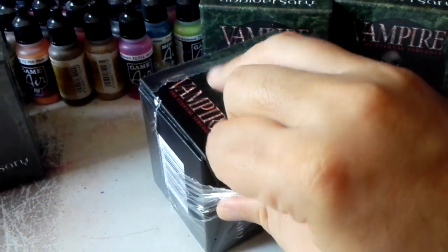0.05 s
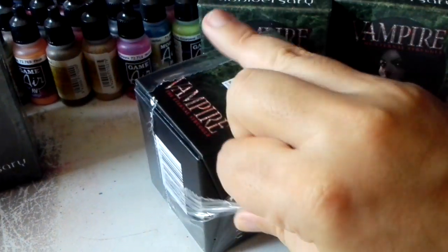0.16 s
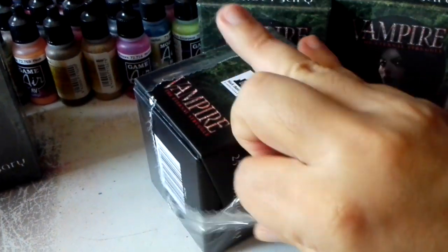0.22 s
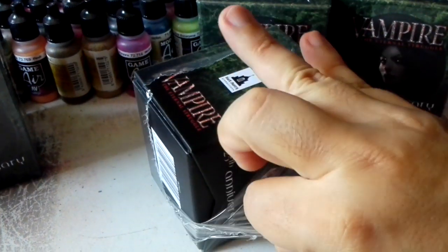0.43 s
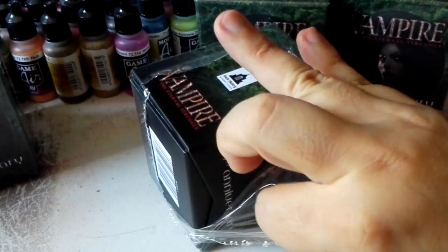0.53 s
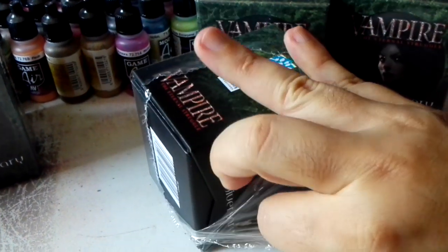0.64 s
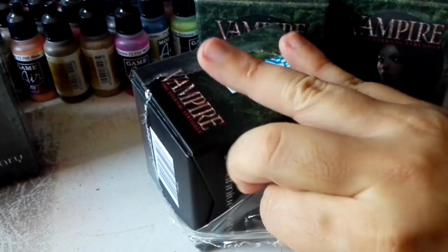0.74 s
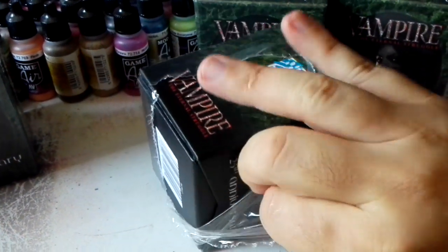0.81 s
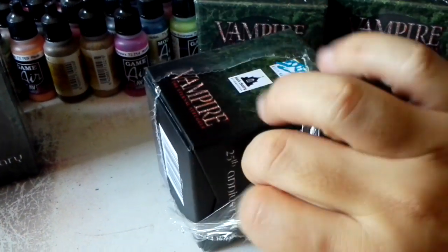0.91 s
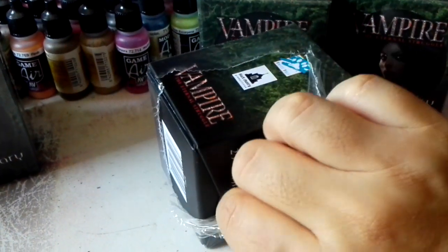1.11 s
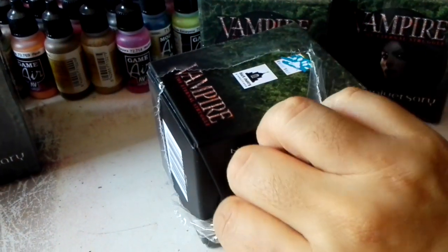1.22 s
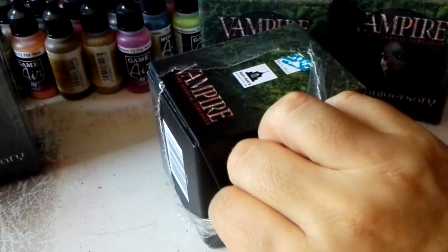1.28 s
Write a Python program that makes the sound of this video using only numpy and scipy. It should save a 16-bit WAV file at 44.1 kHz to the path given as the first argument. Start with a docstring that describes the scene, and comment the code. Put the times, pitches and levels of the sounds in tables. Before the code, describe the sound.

Shrink wrap is peeled off a cardboard box, close and bright on the left, duller on the right. Crinkles build to a hard, loud crack with a hollow box knock at 0.25 s, then a lull. A smaller tear snaps at 0.47 s. From 0.7 to 1.3 s come uneven rustles, scattered snaps and soft thuds, with a brief fingertip judder at 0.8 s. Small room, faint low rumble.

```python
"""Peeling shrink wrap off a box

Shrink wrap is peeled off a cardboard box, close to the left microphone in a small room.
The film buckles in snaps of shaped noise with a short added ring, and tears loose twice with a crack.
It slides with filtered hiss, sparse crinkles and pitched crackles; short noise tails give the room.
Tugs and fingers excite the hollow box's modes, a fingertip judders over it once, and soft thuds are low sines."""
import sys
import numpy as np
from scipy import signal
from scipy.fft import rfft, irfft, next_fast_len
from scipy.io import wavfile
from scipy.ndimage import uniform_filter1d, map_coordinates

SR = 44100
rng = np.random.default_rng(int(sys.argv[2]) if len(sys.argv) > 2 else 0)


def wav_out(sig):
    """Save sig, one row per channel (or a flat mono array), as 16-bit PCM at SR to the path in sys.argv[1]."""
    wavfile.write(sys.argv[1], SR, np.round(np.clip(np.atleast_2d(sig).T, -1, 1) * 32767).astype(np.int16))


N = 59535  # length in samples

# Colour of the sliding film, for hiss, crinkles and crackles. Each row: frequency in Hz, level in dB.
FRICTION_COLOUR = [(200, -43), (700, -9), (1600, -14), (2700, -7.5), (3800, -7), (5000, -11), (7500, -6.5),
                   (10500, -2), (12500, 0), (14100, -3.5), (15000, -42)]

SNAP_RISE_S = 0.0001804  # onset time constant of snaps and pings


def amp(db):
    """Decibels to gain."""
    return 10 ** (np.asarray(db) / 20)


def unit(x):
    """Scaled to rms 1."""
    return x / np.sqrt(np.mean(x ** 2) + 1e-20)


def norm(x):
    """Scaled to energy 1."""
    return x / (np.linalg.norm(x) + 1e-20)


def along(points, hz):
    """Values at hz, read between (Hz, value) points on a log frequency axis."""
    f, v = np.transpose(points)
    return np.interp(np.log(hz + 1), np.log(f), v)


def colour(x, points):
    """Causal minimum-phase filter with the given (Hz, dB) shape."""
    n = x.shape[-1]
    m = 2 * next_fast_len(n // 2 + 1024)
    log_gain = np.log(amp(along(points, np.fft.rfftfreq(m, 1 / SR))))
    # folding the cepstrum onto positive times makes the filter causal
    cepstrum = irfft(log_gain, m)
    cepstrum[1:m // 2] *= 2
    cepstrum[m // 2 + 1:] = 0
    response = np.exp(rfft(cepstrum))
    return irfft(rfft(x, m) * response, m)[..., :n]


def tinted(points):
    """A spectrum with random bumps and dips: every fold of film has a colour of its own."""
    tint_db = 2
    return [(hz, db + tint_db * rng.standard_normal()) for hz, db in points]


def add(track, s, sound):
    """Mixes a sound into the track at time s."""
    part = track[max(0, round(s * SR)):][:len(sound)]
    part += sound[:len(part)]


def delay(x, s):
    """The same sound s seconds later."""
    return np.pad(x, (max(0, round(s * SR)), 0))[:N]


def wobble(rate):
    """A smooth random curve, rate knots a second."""
    return map_coordinates(rng.standard_normal(N), [np.arange(N) * rate / SR], mode="wrap")


def floor():
    """Low room rumble, nearly the same on both sides, and a faint hiss."""
    # The room's background. Each row: frequency in Hz, level in dB.
    floor_colour = [(25, -9), (45, 6), (110, -0.5), (220, 1.5), (280, -6.5), (400, -5.5), (600, -13.5),
                    (1200, -18), (2500, -22.5), (5000, -32), (12000, -36.5), (15000, -45)]
    # Stereo spread, side against mid. Each row: frequency in Hz, level in dB.
    side_colour = [(30, -11.5), (150, -17), (400, -2.5), (1500, -1), (8000, 5.5)]
    floor_db = -51
    mid, side = unit(colour(rng.standard_normal((2, N)), floor_colour))
    side = colour(side, side_colour)
    return amp(floor_db) * np.array([mid + side, mid - side])


def ping(hz, t60):
    """A short decaying ring whose pitch is unsteady."""
    blur_hz = 435  # rms pitch drift
    t = np.arange(SR // 40) / SR
    drift = blur_hz * unit(uniform_filter1d(rng.standard_normal(len(t)), size=64))
    tone = np.sin(2 * np.pi * np.cumsum(hz + drift) / SR)
    rise = 1 - np.exp(-t / SNAP_RISE_S)
    return norm(amp(-60 * t / t60) * rise * tone)


def crackles(count=1800):
    """Larger creases among the crinkles give way at random, each with its own pitch and size."""
    per_s, spread_db, t60_s = 750, 3.5, .004
    centre_hz, spread_oct, top_hz = 9136, .55, 14138  # pitches at or above the top are left out
    out = np.zeros(N)
    gaps, sizes = rng.exponential(size=(2, count))
    times = np.cumsum(gaps) / per_s
    pitches = centre_hz * 2 ** (spread_oct * rng.standard_normal(count))
    for s, size, hz in zip(times, np.minimum(sizes, 4), pitches):
        if hz < top_hz:
            level = amp(spread_db * size + along(FRICTION_COLOUR, hz))
            add(out, s, level * ping(hz, t60_s))
    return unit(out)


def slide():
    """Sliding film: a hiss of friction, a spray of tiny crinkles and pitched crackles, in uneven spurts."""
    # Film sliding over the box. Each row: time in seconds, level in dB before the catching wobble.
    slide_level = [(0, -53.5), (0.042, -46), (0.059, -39), (0.102, -46), (0.148, -36), (.205, -36.5),
                   (.24, -38.5), (.275, -30.5), (0.349, -56), (.45, -59.5), (.49, -39.5), (.54, -54.5),
                   (.59, -45.5), (.63, -63), (.708, -61), (.725, -43.5), (.76, -41.5), (.81, -48),
                   (.85, -43.5), (.89, -42), (0.921, -40.5), (0.948, -33.5), (0.996, -50), (1.045, -42),
                   (1.10, -52), (1.14, -44), (1.174, -42.5), (1.21, -47), (1.25, -39.5), (1.288, -41),
                   (1.35, -59)]
    catch_db, catch_knots_per_s = 2, 160  # the sliding film catches and lets go
    hiss_db, crinkle_db, crackle_db = -3, -6.5, -7.5
    crinkles_per_s, crinkle_spread_db = 2400, 4

    stroke_db = np.interp(np.arange(N) / SR, *np.transpose(slide_level))
    level = amp(stroke_db + catch_db * wobble(catch_knots_per_s))
    hiss = unit(colour(rng.standard_normal(N), FRICTION_COLOUR))
    sizes = amp(crinkle_spread_db * np.minimum(rng.exponential(size=N), 4))
    grains = sizes * rng.choice([-1, 1], N) * (rng.random(N) < crinkles_per_s / SR)
    crinkles = unit(colour(grains, FRICTION_COLOUR))
    return level * (amp(hiss_db) * hiss + amp(crinkle_db) * crinkles + amp(crackle_db) * crackles())


def snaps():
    """Each buckle is a sub-millisecond crack, then a brief flutter of the sheet, with a short ring added."""
    # Film snaps. Each row: start in seconds, level in dB, midrange body in dB, pitch in Hz of a short ring
    # added to the snap, ring in dB; the three levels are relative to the common ones below.
    snap_rows = [(0.0191, -38, 12.5, 4930, -7), (0.049, -24, 4, 10930, -10),
                 (0.054, -28, -11.5, 7840, -4.5), (0.0728, -22, 4.0, 9146, -0.5),
                 (0.1296, -40, 16.5, 3920.0, -17.5), (0.2158, -22.5, 0, 9130, -12),
                 (0.218, -19, 3.0, 10340, -7), (0.2229, -22.0, -6.5, 12830, 5.5),
                 (0.2317, -25.5, 6.5, 8940, -5), (0.2473, -10.5, -7.5, 10970, -7),
                 (0.2483, -9.5, -9.5, 3400, -5), (0.2521, -11, -4.5, 11970, 3), (0.2534, -1, 0, 12200, -3),
                 (0.254, -3.5, 1.5, 12150, -3.5), (0.2566, -17.5, -22, 13000, -12),
                 (0.2596, -15, -25.5, 13080, -5), (0.2624, -15, -27, 8754, 3.5),
                 (0.266, -11, -21, 8760, -15.5), (0.346, -42.5, 6, 13350.0, -4.5),
                 (0.4199, -39, 4, 13400, -2), (0.4495, -37.5, -9.5, 4940, -20.5),
                 (0.4616, -32, 1, 7200, -4), (0.4664, -27.5, 7, 6980.0, -11.5),
                 (0.471, -12.5, 2, 11450, 5.5), (0.4723, -13.5, 3, 6475, -21),
                 (0.4736, -25.5, 14, 5086, -17.5), (0.479, -31.5, 8, 13350.0, -4.5),
                 (0.4809, -39, -8, 12790.0, -5.5), (0.51, -37.5, 8, 12600, -1),
                 (0.5264, -38.5, 4.0, 11800, -4.5), (0.542, -40.0, 3.5, 13350.0, -3.0),
                 (0.552, -25, -6, 13310, 2.5), (0.5517, -29.5, -1.5, 13440, 2),
                 (0.5778, -32.5, 5, 7600, -15.5), (0.5801, -33.5, -1, 3270, -21),
                 (0.644, -33.5, -0.5, 6335, -21), (0.714, -33, 4, 11190, -7),
                 (0.7172, -18.5, -15.5, 12500, -3), (0.7558, -31, -4.5, 12190.0, -2),
                 (0.7614, -33, 7, 11460.0, -1.5), (0.7719, -45.5, 2, 13310.0, -9.5),
                 (0.7912, -27, 3.5, 10100, -9.5), (0.8307, -31.5, 11.5, 3206, -6.5),
                 (0.8984, -20, -1.5, 7600, -6.5), (0.9057, -31, 5, 11080, -4.5), (0.92, -29, -9, 3220, -7),
                 (0.959, -20.5, -3.5, 11920, -14), (0.9688, -29.5, 8, 6483, -2),
                 (1.0113, -22.5, -2, 3786, -13), (1.013, -26.0, -17.5, 13860, 1),
                 (1.0367, -26.5, -14, 9770, 2.5), (1.0541, -36, 12, 7680, -6),
                 (1.0677, -30.5, 0, 4430, -4.5), (1.0839, -36, 5.5, 10900.0, -0.5),
                 (1.1114, -28.5, -5, 13300, -14), (1.118, -28.5, 7.5, 8730, -6),
                 (1.1267, -33, 4, 11970.0, -7), (1.1504, -17, 5.5, 6900, -4.5), (1.1533, -23, 4, 4140, -19),
                 (1.158, -28.5, -9.5, 9170, 5.5), (1.1932, -31.5, 6, 3220, -13.5),
                 (1.2237, -35, 12, 3200, -9.5), (1.2341, -30, 3, 4220, -6.5), (1.2374, -28, 5, 12270, -5.0),
                 (1.2479, -27.5, 9, 4967, -4), (1.2703, -28, 8.5, 3315, -11.0),
                 (1.2894, -32, 12.5, 8000, -12.0), (1.302, -32.0, 1, 13480.0, -0.5)]
    # The film's bright snap. Each row: frequency in Hz, level in dB before tinting.
    film_colour = [(300, -87), (2500, -24), (5000, -20.5), (7500, -9.5), (9500, -4.5), (11500, 3),
                   (13200, 1.5), (14300, -12), (16000, -31)]
    # The stretched sheet's midrange. Each row: frequency in Hz, level in dB before tinting.
    sheet_colour = [(150, -28), (600, -8.5), (1100, -6), (1700, -2.5), (2300, -5), (2750, -6.5),
                    (3400, 0.5), (5000, -8), (8000, -4), (15000, -21)]
    snap_db, flutter_db, body_common_db, ring_common_db = 14, -5.5, -12.5, -0.5
    flutter_t60_s, ring_t60_s = 0.02235, .012

    out, t = np.zeros(N), np.arange(SR // 40) / SR
    crack = norm(t * np.exp(-t / SNAP_RISE_S))
    flutter = norm(amp(-60 * t / flutter_t60_s))
    for s, db, body_db, ring_hz, ring_db in snap_rows:
        crack_noise, flutter_noise, body_noise = rng.standard_normal((3, len(t)))
        fold_colour = tinted(film_colour)
        bright = norm(colour(crack_noise * crack, fold_colour))
        bright = bright + amp(flutter_db) * norm(colour(flutter_noise * flutter, fold_colour))
        body = norm(colour(body_noise * (crack + flutter), tinted(sheet_colour)))
        ring = amp(ring_common_db + ring_db) * ping(ring_hz, ring_t60_s)
        add(out, s, amp(db + snap_db) * (bright + amp(body_common_db + body_db) * body + ring))
    return out


def box_ring(centre_hz, width_oct):
    """The box's modes after one blow; those near the centre frequency are favoured."""
    # Modes of the hollow box. Each row: frequency in Hz, level in dB, 60 dB decay time in seconds.
    modes = [(171.7, 2.5, 0.044), (212.46, 6, 0.1053), (342.6, 1, 0.074), (407, -2, 0.0303),
             (443.1, -3, 0.0725), (569.6, -2, 0.0217), (731.3, -4.5, 0.0291), (818.6, -7, 0.0217),
             (939.3, 0, 0.0264), (1066.2, -6, 0.0516), (1264, 4, 0.0077), (1634, 4, 0.021),
             (2114, 10, 0.00604)]
    t = np.arange(SR // 6) / SR
    hz, db, t60 = np.transpose(modes)[:, :, None]
    nearness = 1 / (1 + (np.log2(hz / centre_hz) / width_oct) ** 2)
    gain = amp(db + rng.normal(0, 1, hz.shape)) * nearness * rng.choice([-1, 1], hz.shape)
    ringing = gain * amp(-60 * t / t60) * np.sin(2 * np.pi * hz * t)
    return norm(np.sum(ringing, axis=0))


def knocks():
    """Tugs and fingers knock the box, each contact point exciting its own range of modes."""
    # Knocks. Each row: start in seconds, level in dB, centre in Hz and width in octaves of the modes excited.
    knock_rows = [(.049, -19, 726, 0.223), (0.1664, -13.5, 1060, 0.564), (.168, -21, 200, 0.36),
                  (.248, -10, 732, 0.23), (0.2501, -5, 203, 0.29), (.2535, -8.5, 374.7, 0.186),
                  (0.254, -10.5, 774, 0.16), (0.2549, -7.5, 1628, 0.43), (.277, -29, 350, 0.43),
                  (0.4605, -12, 647, 0.306), (.4655, -15, 423, 0.79), (0.4727, -14.5, 489, 0.394),
                  (.5266, -28, 1170, 0.59), (0.5523, -23, 1780, 1), (0.718, -27, 1370, 0.61),
                  (.756, -20, 277, 0.49), (0.7983, -20.5, 640, 0.47), (.8445, -13, 396, 0.79),
                  (.848, -21.5, 790, 0.266), (.869, -22, 300, 0.69), (0.9683, -17, 465, 0.27),
                  (.977, -13.5, 302, 0.73), (1.046, -24.5, 1176, 0.39), (1.151, -17.5, 1163, 0.104),
                  (1.153, -19, 331, 0.28), (1.158, -22.5, 1480, 0.45), (1.247, -24.5, 1070, 0.223)]
    out = np.zeros(N)
    for s, db, centre_hz, width_oct in knock_rows:
        add(out, s, amp(db) * box_ring(centre_hz, width_oct))
    return out


def thuds():
    """Soft thuds as the hand pushes the box against the table: low sines that swell and die."""
    # Thuds. Each row: start in seconds, level in dB, pitch in Hz.
    thud_rows = [(0.465, -40, 180.8), (.792, -39, 185), (0.8408, -27.5, 153.9), (.856, -41, 205.6),
                 (0.9658, -33, 177), (0.98, -47.5, 201), (1.146, -41.5, 178)]
    rise_s = 0.00288  # half the time to the peak
    out, t = np.zeros(N), np.arange(SR // 10) / SR
    swell = (t / rise_s) ** 2 * np.exp(-t / rise_s)
    for s, db, hz in thud_rows:
        add(out, s, amp(db) * swell / swell.max() * np.sin(2 * np.pi * hz * t))
    return out


def judder():
    """A fingertip sticks and slips over the box, slowing and uneven; each slip also rings the modes."""
    # One soft slip of the fingertip. Each row: frequency in Hz, level in dB.
    slip_colour = [(70, -22), (170, 3.5), (400, 4), (650, -10.5), (950, -17.5), (1300, -27), (4000, -47.5)]
    start_s, length_s, scatter_s = .800, 0.039, 0.000405
    start_hz, end_hz = 498.6, 240.8  # slips a second
    level_db, spread_db, ring_db = -24, 2.95, -12.5

    out = np.zeros(N)
    ring = box_ring(centre_hz=338, width_oct=0.48)
    slip = norm(colour(signal.unit_impulse(len(ring)), slip_colour)) + amp(ring_db) * ring
    rate = np.linspace(start_hz, end_hz, int(length_s * SR))
    slips_so_far = np.floor(np.cumsum(rate) / SR)
    for i in np.flatnonzero(np.diff(slips_so_far, prepend=-1)):
        s = start_s + i / SR + scatter_s * rng.standard_normal()
        add(out, s, amp(level_db + rng.normal(0, spread_db)) * slip)
    return out


def room(x, count=12):
    """A short diffuse tail, each frequency dying at its own speed; random tails crossfade over time."""
    # Decay of the small room. Each row: frequency in Hz, 60 dB decay time in seconds.
    room_t60 = [(150, 0.264), (1000, 0.106), (5000, 0.074), (13000, 0.168)]
    room_db, gap_s = -13, .004
    hz, t, z = signal.stft(rng.standard_normal((count, SR // 3)), SR, nperseg=256)
    decay = amp(-60 * t / along(room_t60, hz)[:, None])
    tails = signal.istft(z * decay, SR, nperseg=256)[1]
    position = np.linspace(0, count - 1, N)
    fades = np.maximum(0, 1 - abs(position - np.arange(count)[:, None]))
    wet = np.zeros(N)
    for fade, tail in zip(fades, tails):
        wet += signal.fftconvolve(x * np.sqrt(fade), norm(tail))[:N]
    return amp(room_db) * delay(wet, gap_s)


def scene():
    """The right microphone hears the film later and much duller; the box is near the middle."""
    # Film at the right microphone against the left. Each row: frequency in Hz, level in dB.
    right_colour = [(100, 20), (450, 6), (900, -4), (2000, 1), (3500, -0.5), (5500, -3), (8000, -9.5),
                    (11000, -19.5), (15000, -20.5)]
    film_lag_s, film_direct_db, film_room_db = .00015, -5, 7  # right microphone
    box_lag_s, box_right_db, box_room_db = .00008, -3, -0.5

    film = slide() + snaps()
    box = knocks() + thuds() + judder()
    box = box + amp(box_room_db) * room(box)
    left = film + room(film) + box
    far_film = amp(film_direct_db) * delay(film, film_lag_s) + amp(film_room_db) * room(film)
    right = colour(far_film, right_colour) + amp(box_right_db) * delay(box, box_lag_s)
    return np.array([left, right]) + floor()


def record(dry):
    """Peaks beyond full scale clip; then everything from the band limit up is removed."""
    top_hz = 16000
    clipped = np.clip(dry, -1, 1)
    m = next_fast_len(N + SR // 4)
    kept = np.fft.rfftfreq(m, 1 / SR) < top_hz
    return irfft(rfft(clipped, m) * kept, m)[:, :N]


dry = scene()
out = record(dry)
wav_out(out)
```